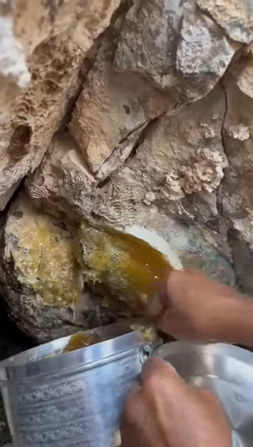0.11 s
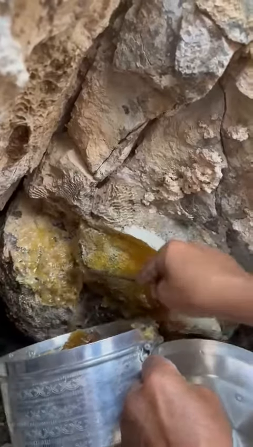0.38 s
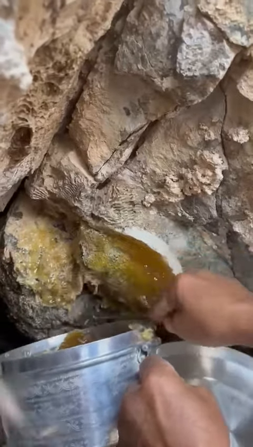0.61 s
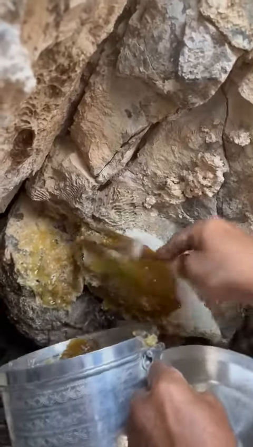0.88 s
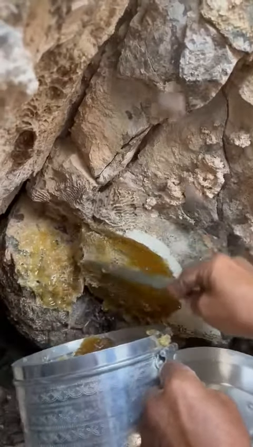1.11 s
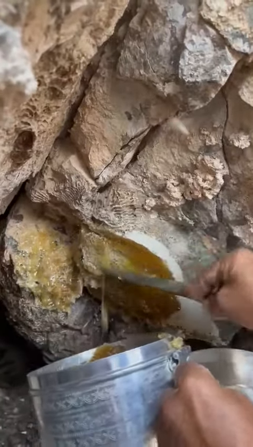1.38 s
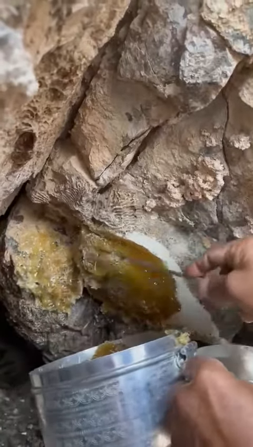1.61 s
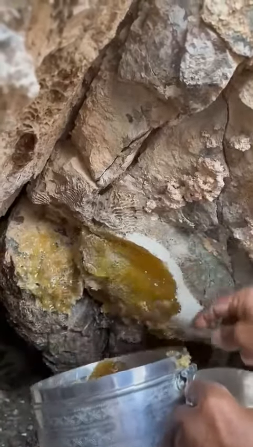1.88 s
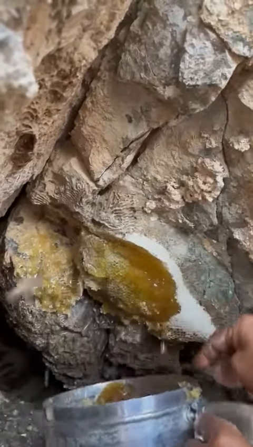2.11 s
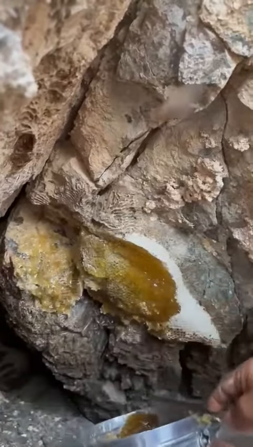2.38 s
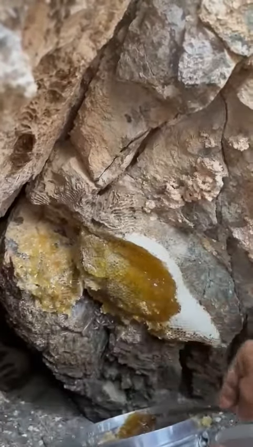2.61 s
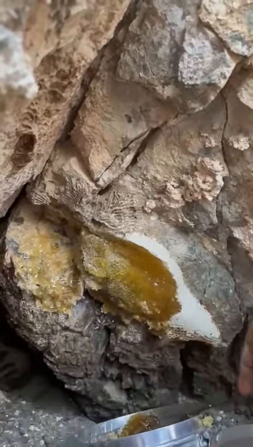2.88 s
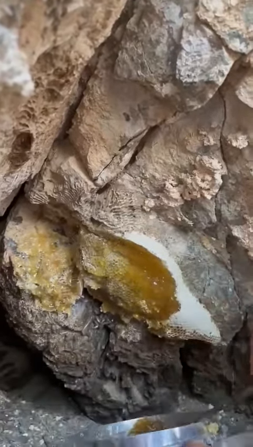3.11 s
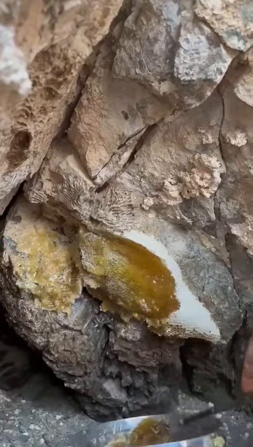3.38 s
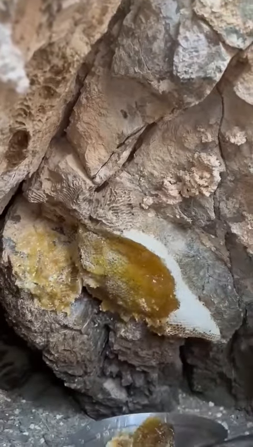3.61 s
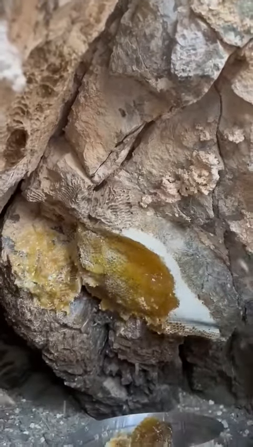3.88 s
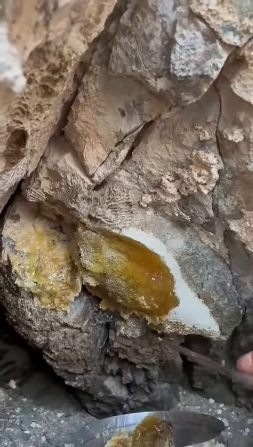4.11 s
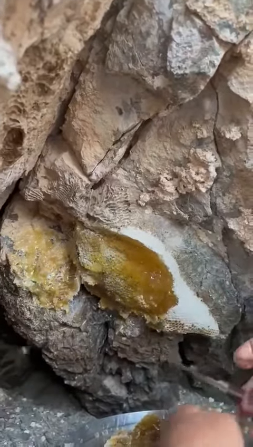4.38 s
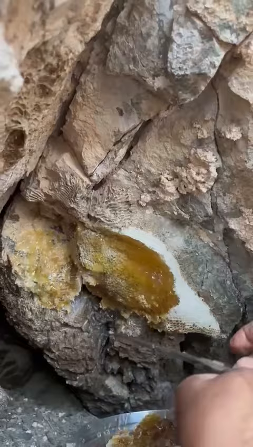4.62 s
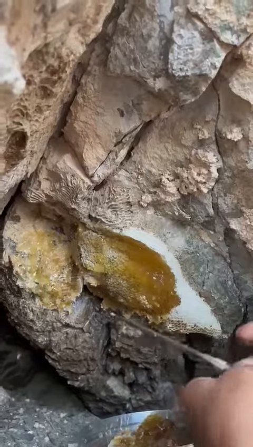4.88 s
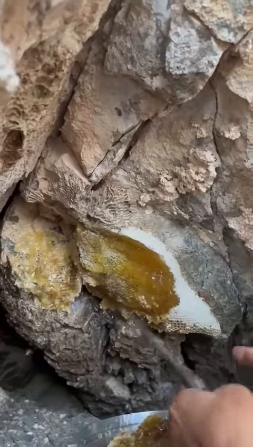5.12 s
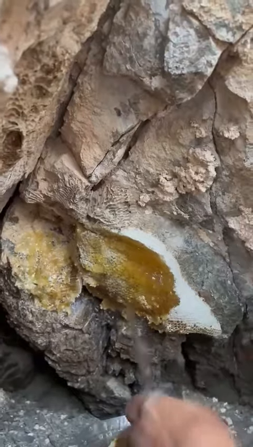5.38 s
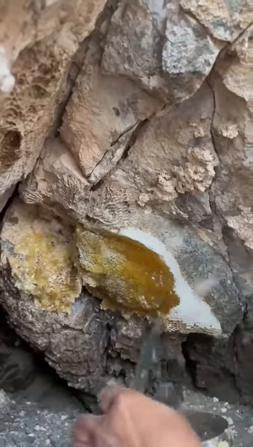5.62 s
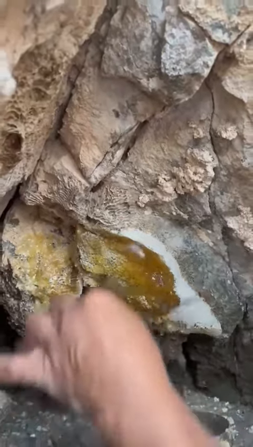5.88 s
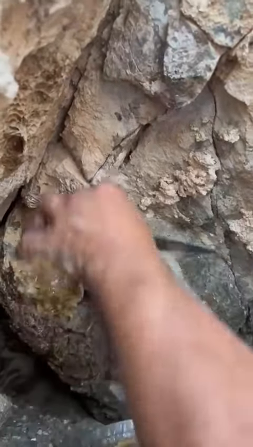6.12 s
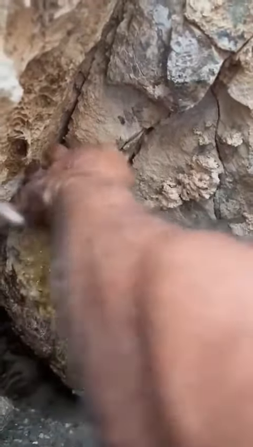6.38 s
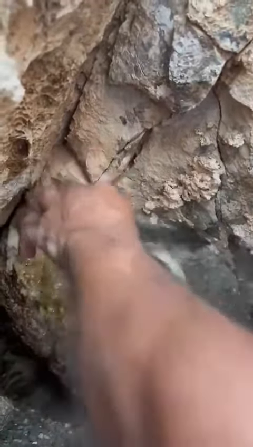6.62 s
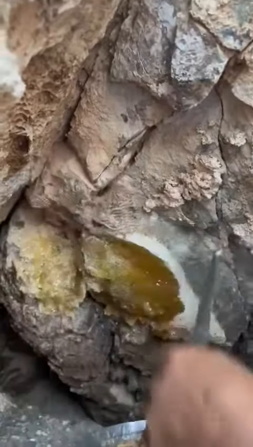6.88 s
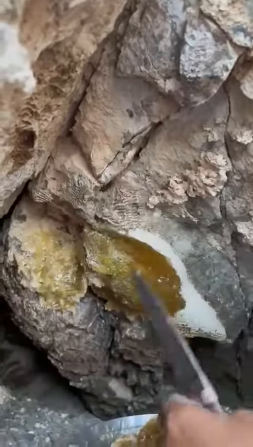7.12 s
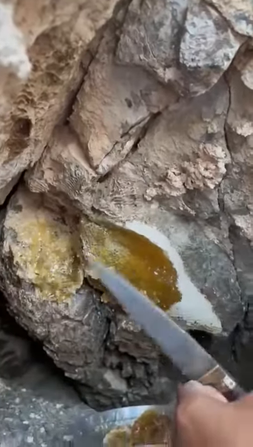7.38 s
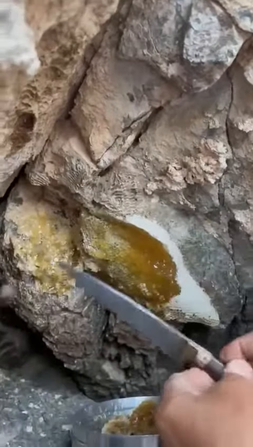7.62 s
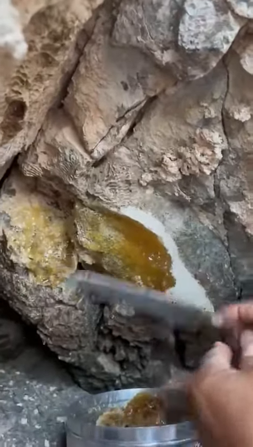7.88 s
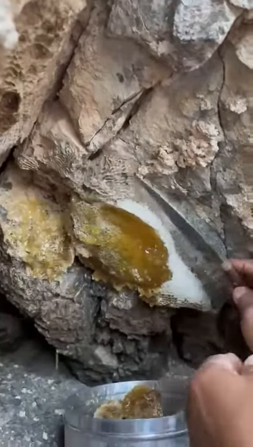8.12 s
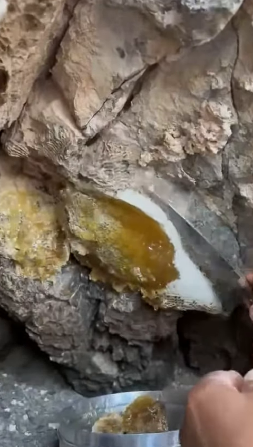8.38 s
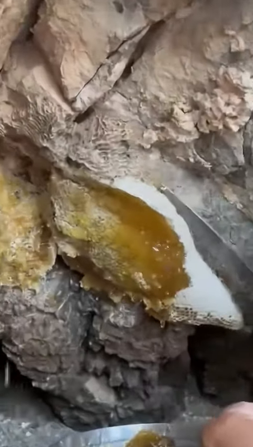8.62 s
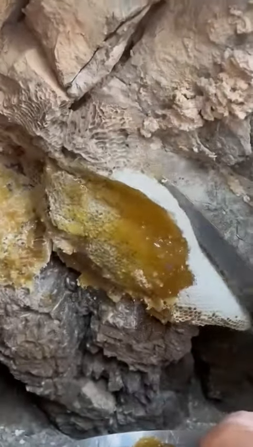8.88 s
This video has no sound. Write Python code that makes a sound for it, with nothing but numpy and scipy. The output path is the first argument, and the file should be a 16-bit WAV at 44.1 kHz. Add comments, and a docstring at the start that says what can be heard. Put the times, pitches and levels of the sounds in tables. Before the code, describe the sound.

Quiet low wind runs throughout, outdoors by a rock face, picked up close in stereo. Almost at once, at 0.06 s, a knife knocks hard, and again at 0.5 s, with gritty crunch and a short hollow metal clank. Faint ticks and touches follow around 1 to 2 s. At 2.25 s a firm knock and scrape lands, then a thin pot drags over grit in two short humming pushes between 2.55 and 3 s. From 3.0 to 4.4 s comes the densest run: bright clicks, scrapes and rubbing, with brief metallic ringing, clearest near 3.6 and 3.9 s. A near-still gap lasts until 5.35 s, when softer scratches come, then light scattered touches to 6.7 s. Scrapes return at 7.2 s, a thin high hiss swells faintly near 8 s, and a sharp ringing tap at 8.4 s closes, leaving wind. Tight rock echoes surround the metal.

```python
"""Low wind and faint rubbing come first; at once a knife knocks, then cuts and scrapes in a hollow of a rock face.
A thin metal pot is held close by. Each contact is a short grind of grit that drives damped modes of blade and pot;
blows add single notes, and some contacts leave the metal singing. Later the pot drags over grit in two pushes,
and a thin high hiss swells and fades. Rock echoes surround the metal; two microphone ports hear it all.
"""
import sys
import numpy as np
from scipy import signal
from scipy.fft import rfft, irfft, next_fast_len
from scipy.io import wavfile

SR = 44100
rng = np.random.default_rng(int(sys.argv[2]) if len(sys.argv) > 2 else 0)


def field_ratio(decibels):
    """Amplitude ratio for a level in dB (20 dB per decade); scalars and array-likes work."""
    return 10 ** (np.asarray(decibels, dtype=float) / 20)


def log_audio(samples):
    """Write samples as a 16-bit WAV file to the path given in sys.argv[1]."""
    # one column per channel
    frames = np.atleast_2d(samples).T
    # limit to full scale, then quantise
    limited = np.clip(frames, -1, 1)
    pcm = np.round(limited * 32767).astype(np.int16)
    wavfile.write(sys.argv[1], SR, pcm)


N = 396889

# wind level over time: start_s, level_db
WIND_LEVEL = [(0.0, -40.5), (1.8, -43.5), (2.33, -40), (2.7, -40.5), (3.53, -40.5), (4.9, -42), (5.81, -39),
              (6.36, -38.5), (6.72, -43), (8.32, -42), (8.7, -45.5), (9.0, -43.5)]
# relative wind spectrum: pitch_hz, level_db (per Hz)
WIND_SPECTRUM = [(25, -23.5), (45, -4), (80, 2.5), (163, -8.5), (268, -4.5), (450, -15), (741, -21),
                 (1400, -31.5), (2730, -42.5), (5500, -51), (8000, -46), (11500, -63.5), (12800, -60)]
# left-right likeness of the wind: pitch_hz, correlation (1 = the same on both sides)
WIND_LIKENESS = [(60, .998), (200, .998), (500, 0.66), (1200, 0.46), (2600, 0.67), (5000, 1), (7000, 1)]
# slow rubbing of blade and hands: start_s, drive_db
RUBBING_LEVEL = [(0.0, -62), (0.87, -74), (2.18, -66.5), (2.68, -52.5), (2.82, -56.5), (3.11, -45.5),
                 (3.4, -62.5), (3.61, -47.5), (3.75, -70.5), (4.05, -53.5), (4.41, -65.5), (4.54, -81.5),
                 (5.45, -64.5), (6.44, -72), (7.14, -62.5), (7.49, -69.5), (8.32, -64), (8.62, -73.5),
                 (9.0, -61)]
# contacts of the edge: start_s, low_mode_drive_db, high_mode_drive_db, grind_s
EDGE_CONTACTS = [(0.059, -20, -23.5, 0.008), (0.07, -42, -30.5, 0.0094), (0.091, -39.5, -27, .0068),
                 (0.479, -17, -19.5, 0.0077), (0.493, -22, -28.5, 0.019), (0.512, -23, -27.5, 0.013),
                 (0.584, -60, -52, .0042), (0.714, -60, -53, 0.0036), (0.831, -47, -52, .0089),
                 (1.043, -42, -32.5, 0.018), (1.067, -46, -31.5, 0.0073), (1.108, -61, -56, 0.0039),
                 (1.314, -62, -61, 0.024), (1.35, -40.5, -61, 0.0079), (1.794, -57, -55.5, 0.0064),
                 (1.837, -51.5, -48.5, 0.0048), (1.865, -66, -56, 0.0047), (1.899, -66, -65, 0.0079),
                 (1.99, -56, -65, 0.004), (2.108, -50, -60, 0.013), (2.182, -55, -37.5, 0.01),
                 (2.222, -51, -41.5, .0075), (2.239, -33, -39.5, 0.028), (2.262, -20.5, -22.5, 0.015),
                 (2.292, -24.5, -31, 0.01), (2.311, -34, -25.5, 0.011), (2.337, -34.5, -54, .011),
                 (2.37, -42, -51, 0.11), (2.401, -38.5, -50, .0062), (2.772, -58, -52, 0.0042),
                 (3.015, -19, -18, 0.014), (3.033, -27, -12, 0.01), (3.045, -22.5, -17.5, 0.0051),
                 (3.08, -28.5, -27, 0.0065), (3.104, -32, -32, 0.032), (3.136, -25, -21.5, .011),
                 (3.19, -32, -26, .0065), (3.201, -23.5, -37, 0.012), (3.214, -31.5, -32.5, 0.027),
                 (3.242, -30.5, -33.5, 0.0096), (3.432, -21, -30, 0.0062), (3.442, -29.5, -40.5, 0.01),
                 (3.488, -34.5, -51, 0.004), (3.515, -58, -51, 0.0027), (3.592, -25, -35, 0.016),
                 (3.611, -25, -31, .0078), (3.625, -16.5, -14.5, 0.0053), (3.683, -45, -60.5, 0.025),
                 (3.72, -39, -58, 0.034), (3.901, -40, -33.5, 0.0057), (3.911, -17, -13, 0.009),
                 (3.968, -22.5, -27, .0089), (3.975, -23, -21.5, 0.011), (4.116, -48.5, -45.5, 0.022),
                 (4.133, -48, -31.5, .015), (4.15, -47.5, -18, 0.01), (4.173, -33.5, -35, 0.014),
                 (4.235, -37.5, -24, 0.012), (4.257, -42, -33, 0.0044), (4.35, -30.5, -34.5, 0.017),
                 (4.385, -21.5, -31.5, 0.0098), (4.396, -22, -25.5, 0.0095), (4.418, -37, -33.5, 0.0046),
                 (5.343, -38, -32, 0.038), (5.37, -30, -28.5, 0.019), (5.397, -40.5, -30.5, 0.018),
                 (5.491, -48, -55, 0.0053), (5.526, -33, -24.5, 0.018), (5.55, -45, -28, 0.014),
                 (5.853, -44, -70.5, .0044), (5.93, -63, -66, 0.069), (6.002, -37.5, -31.5, 0.0027),
                 (6.131, -42, -30.5, 0.0035), (6.166, -38.5, -31.5, 0.023), (6.223, -37.5, -45, 0.0067),
                 (6.36, -58, -59.5, 0.053), (6.42, -51, -68.5, 0.031), (6.637, -51.5, -46.5, 0.018),
                 (6.662, -38.5, -36, 0.0031), (6.698, -51, -34, 0.0036), (6.709, -45.5, -42, 0.0057),
                 (7.162, -25.5, -24.5, 0.02), (7.19, -29.5, -26.5, 0.019), (7.217, -28, -32, 0.011),
                 (7.522, -41, -51.5, .0018), (8.106, -59, -42, 0.0024), (8.14, -57, -44.5, 0.015),
                 (8.252, -62, -45.5, .0042), (8.351, -37.5, -46, 0.023), (8.408, -19, -22, 0.0039),
                 (8.417, -24, -22.5, 0.013), (8.449, -45, -54, .0095)]
# thud against the low modes, heavy while cutting, light while tapping the rim: start_s, level_db
THUD_WEIGHT = [(0.0, -3.5), (0.5, -8), (1.4, 1), (2.3, 1), (3.0, -5), (3.45, -6), (3.6, -10), (4.4, -9.5),
               (5.4, -1.5), (6.0, -0.5), (7.2, -8), (8.4, -7.5)]
# centres of thud, knock, rasp and grit: pitch_hz
BAND_CENTRES = [350, 1000, 2500, 7000]
# damped modes of blade and pot: pitch_hz, width_hz (before the thin steel narrows it), relative level_db
DAMPED_MODES = [(244, 63, -3), (403, 34, -1), (584.5, 52, -3), (661, 72, -1.5), (892, 110, -0.5),
                (1067, 77, -1.5), (1244, 160, -12), (1483, 150, -7.5), (1640, 120, 0.5), (1946, 280, -3),
                (2470, 440, -1.5), (2860, 320, -3), (3244, 190, -0.5), (3696, 400, -5.5), (4182, 250, -2),
                (4940, 810, -2), (5654, 690, 1), (6440, 650, -0.5), (7010, 1100, -3), (7770, 260, -2),
                (8640, 1200, 0.5), (9400, 400, -5), (10265, 280, -3), (10900, 1400, -6.5),
                (11425, 690, -11.5)]
# blows, with the weight of the hand low, the pot wall near 1 kHz, the blade tip high:
# start_s, relative level_db, pitch_hz
BLOW_NOTES = [(0.06, -12, 347), (0.061, -12.5, 1082), (0.479, -7.5, 367), (0.481, -4.5, 1047),
              (0.494, -9, 1033), (1.045, -32, 2320), (1.068, -23, 2370), (1.072, -32, 5300),
              (1.078, -28, 2680), (1.352, -25, 390), (2.267, -8, 420), (2.266, -7.5, 1043),
              (2.297, -15.5, 300), (2.339, -20, 121), (2.451, -21.5, 384), (3.018, -12.5, 1150),
              (3.04, -22, 412), (3.081, -24.5, 904), (3.434, -15.5, 951), (3.595, -6.5, 910),
              (3.624, -12, 870), (3.6258, -7, 5370), (3.686, -35, 2400), (3.7204, -34, 2400),
              (3.913, -14.5, 1030), (3.978, -13, 918), (4.353, -14.5, 924), (4.389, -17.5, 609),
              (5.37, -29, 330), (5.855, -30, 500), (5.971, -25.5, 266), (6.2235, -29, 2248),
              (7.17, -22, 300), (8.354, -26.5, 990), (8.411, -13, 1122), (8.414, -15, 373)]
# ringing time of a blow: pitch_hz, t60_s
BLOW_DECAY = [(120, .045), (400, .04), (950, 0.068), (2300, .03), (5400, 0.031)]
# echoes off the rock faces: delay_s (left side), left_db, right_db
ROCK_ECHOES = [(.004, -18, -21), (.007, -15, -14), (.012, -17, -17), (.019, -20.5, -20)]
# moments when the metal is left free and sings: start_s, relative low_mode_db, relative high_mode_db
FREE_TAPS = [(0.095, -36, -28.5), (0.5151, -18.5, -31.5), (1.3504, -32, -51), (2.2932, -15, -15.5),
             (3.048, -21.5, -18.5), (3.6234, -21, -11), (3.914, -2, -4), (3.9775, -12.5, -13),
             (4.399, -24.5, -20), (4.4166, -33.5, -16.5), (5.5485, -23, -26), (7.221, -10, -21.5),
             (8.4188, -16.5, -8.5)]
# modes of the free metal: pitch_hz, relative level_db, t60_s
FREE_MODES = [(1065, -5, .18), (1136, -4, .2), (1690, -13, .18), (2425, -14, .12), (2580, -18, .2),
              (3210, 0, .15), (3500, -18, .18), (4130, -13, .13), (4463, -5, .11), (5093, -10, .09),
              (6180, -7, .065), (8800, -9, .06)]
# two pushes of the pot over grit: start_s, level_db
DRAG_LEVEL = [(2.47, -66), (2.53, -70), (2.565, -44.5), (2.79, -53.5), (2.874, -43.5), (3.0, -53.5)]
# modes of the pot resting on stone: pitch_hz, width_hz, relative level_db
DRAG_MODES = [(835, 32, -4), (1080, 30, -0.5), (1655, 30, -0.5), (2522, 46, -11), (3195, 140, -14.5),
              (3707, 79, -11.5), (4260, 120, -15), (4783, 140, -19.5), (5770, 350, -26)]
# thin high hiss: start_s, level_db
HISS_LEVEL = [(7.885, -90), (7.93, -65), (8.03, -53.5), (8.12, -78)]
# microphone ports: pitch_hz, lead of the right port (radians)
PORT_LEAD = [(150, 0), (400, .6), (750, 1.1), (1400, .1), (1950, 0), (2600, -1.3), (3300, -1.2),
             (3800, -.4), (4400, -1.8), (5100, 0), (6100, -1.5), (6850, -3.05), (8600, -3.2), (9200, -4.7),
             (10000, -6.2), (12500, -5.6)]


def rms_one(x):
    """Scales a signal to rms 1."""
    return x / np.sqrt(np.mean(x ** 2) + 1e-20)


def in_time(rows, outside=None):
    """Draws straight lines between the rows, one curve per column after the time."""
    s, *columns = np.transpose(rows)
    return [np.interp(np.arange(N) / SR, s, c, outside, outside) for c in columns]


def at_hz(points, hz):
    """Reads a two-column table at a pitch, along log frequency."""
    return np.interp(np.log(hz), np.log(np.array(points)[:, 0] + 1), np.array(points)[:, 1])


def drift(rate_hz):
    """Slow chance of rms 1: noise at every 20th sample through a double one-pole low-pass."""
    r = np.exp(-40 * np.pi * rate_hz / SR)
    noise = rng.standard_normal(N // 20 + 4002)
    slow = signal.lfilter([1], [1, -2 * r, r * r], noise)[4000:]   # past the settling of the filter
    return np.interp(np.arange(N) / 20, np.arange(len(slow)), rms_one(slow))


def resonance(x, hz, width_hz):
    """A damped mode: two poles, gain 1 on top."""
    r = np.exp(-np.pi * width_hz / SR)
    poles = [1, -2 * r * np.cos(2 * np.pi * hz / SR), r * r]
    return signal.lfilter([(1 - r * r) / 2, 0, (r * r - 1) / 2], poles, x)


def ring(taps, hz, t60_s):
    """A free mode: a unit tap sets a decaying sine of height 1 ringing."""
    r, w = field_ratio(-60 / (t60_s * SR)), 2 * np.pi * hz / SR
    return signal.lfilter([0, np.sin(w)], [1, -2 * r * np.cos(w), r * r], taps)


def grit(per_s, size_db):
    """Dense slips over grains, uneven in size and of either sign; rms 1."""
    sizes = field_ratio(size_db * np.minimum(rng.exponential(1, N), 4)) * rng.choice([-1, 1], N)
    return rms_one(sizes * (rng.random(N) < per_s / SR))


def wind(gust_db):
    """Third-octave noise bands; its slow rise and fall moves mainly the low ones, gusts stir each on its own."""
    edges = 25 * 2 ** np.arange(0, 9.1, 1 / 3)
    white = rng.standard_normal((2, 2, N))
    low_db, = in_time(WIND_LEVEL)
    out = 0
    for k, (low, high) in enumerate(zip(edges, edges[1:])):
        band = signal.butter(2, [low, high], "band", fs=SR, output="sos")
        mid, side = signal.sosfilt(band, white[k % 2])
        hz = np.sqrt(low * high)
        alike = np.clip(at_hz(WIND_LIKENESS, hz), -1, 1)
        swell_db = (low_db - low_db.mean()) / (1 + hz / 900) + gust_db * drift(2.1)
        stereo = np.sqrt(1 + alike) * mid + np.sqrt(1 - alike) * side * [[1], [-1]]
        out = out + field_ratio(at_hz(WIND_SPECTRUM, hz) + swell_db) * stereo
    return field_ratio(low_db.mean()) * rms_one(out)


def contacts():
    """Edge contacts and faint stray touches of crumbs and fingers, with the drive of thud, knock, rasp and grit."""
    stray_count, stray_db, spread_db, stray_grind_s = 14, -72, 5.5, 0.0041
    draw = rng.random((stray_count, 3))
    stray_start = draw[:, 0] * (N / SR - .2)
    stray_drive_db = stray_db + spread_db * 2 * (2 * draw[:, 1:] - 1)
    stray = np.c_[stray_start, stray_drive_db, np.full(stray_count, stray_grind_s)]
    s, low_db, high_db, grind_s = np.vstack([EDGE_CONTACTS, stray]).T
    weight_db = low_db + np.interp(s, *np.transpose(THUD_WEIGHT))
    thud_db = 10 * np.log10(field_ratio(2 * weight_db) + field_ratio(2 * -48))   # the hand always adds some weight
    rasp_db = low_db + 0.49 * (high_db - low_db) - 1   # the middle modes lie between low and high
    return s, grind_s, np.c_[thud_db, low_db, rasp_db, high_db]


def blade_on_rock(rise, sag_s, release_s, linger, spot_db):
    """Grit under contacts and slow rubbing drives damped modes; each spot struck favours others."""
    hz, width_hz, level_db = np.transpose(DAMPED_MODES)
    width_hz = width_hz / (1 + hz / 9000)   # thin steel keeps its high modes sharp
    band = np.searchsorted(np.sqrt(np.multiply(BAND_CENTRES[1:], BAND_CENTRES[:-1])), hz)
    share = field_ratio(level_db)
    band_power = np.bincount(band, share ** 2 * width_hz * np.pi / SR)
    share /= np.sqrt(band_power)[band]   # each band passes about rms 1
    rub_db, = in_time(RUBBING_LEVEL)
    # in the rubbing the knock stands out by 3.5 dB, the thud sinks by 2.5
    dull_db = np.outer(band < 2, 3.5) - np.outer(band == 0, 6.0)
    press = field_ratio(rub_db + 2.4 * drift(25) + dull_db)

    t = np.arange(round(.1 * SR)) / SR
    touches = contacts()
    spots = rng.normal(0, spot_db, (len(touches[0]), len(hz)))
    for s, grind_s, drive_db, spot in zip(*touches, spots):
        # long strokes set in and die away more gently than ticks
        onset = 1 - np.exp(-t / (rise * grind_s))
        release = np.maximum(t - grind_s, 0) / (release_s + linger * grind_s)
        shape = onset * np.exp(-t / sag_s - release)
        start = round(s * SR)
        press[:, start:start + len(t)] += np.outer(field_ratio(drive_db[band] + spot), shape)

    slips = [grit(per_s=5400, size_db=3.0), grit(per_s=5000, size_db=2.0)]
    out = np.zeros(N)
    for k in range(len(hz)):
        mode = resonance(slips[k % 2] * press[k], hz[k], width_hz[k])
        out += mode * share[k] * (-1) ** (k // 2)   # polarity flips every two modes
    return out


def blows(cycles, cycles_growth):
    """A soft push starts each single note; it lasts more cycles the higher the note, which shifts with the grip."""
    out = np.zeros(N)
    for s, level_db, hz in BLOW_NOTES:
        push = np.hanning(round(cycles * (hz / 1000) ** cycles_growth * SR / hz) + 2)
        push = push * np.cos(2 * np.pi * hz / SR * np.arange(len(push)))
        note = ring(np.eye(1, round(.25 * SR))[0], hz, at_hz(BLOW_DECAY, hz))
        swing = np.convolve(note, push)
        start = round(s * SR)
        out[start:start + len(swing)] += field_ratio(level_db) * swing / np.abs(swing).max()
    return out


def hollow(x):
    """Rock faces add a few echoes without bass, at other delays and levels per side."""
    thin = signal.sosfilt(signal.butter(1, [500, 6000], "band", fs=SR, output="sos"), x)
    out = np.array([x, x])
    for s, left_db, right_db in ROCK_ECHOES:
        lags = round(s * SR), round(1.13 * s * SR)   # the right side hears each echo later
        for side, (echo_db, lag) in enumerate(zip((left_db, right_db), lags)):
            out[side, lag:] += field_ratio(echo_db) * thin[:-lag]
    return out


def free_metal(spot_db, below_db):
    """One tap sets every free mode ringing with a strength of its own."""
    s, low_db, high_db = np.transpose(FREE_TAPS)
    out = np.zeros(N)
    spots = rng.normal(0, spot_db, (len(FREE_TAPS), len(FREE_MODES)))
    for k, (hz, level_db, t60_s) in enumerate(FREE_MODES):
        taps = np.full(N, 1e-18)
        tap_db = (low_db if hz < 1400 else high_db) + level_db + spots[:, k] - below_db
        taps[np.round(s * SR).astype(int)] = field_ratio(tap_db)
        out += ring(taps, hz, t60_s)
    return out


def dragged_pot(uneven_db, tilt_db):
    """Grains under the pot keep its narrow modes humming, each catching and letting go on its own."""
    grains = grit(per_s=700, size_db=4.5)
    hum = np.zeros(N)
    for hz, width_hz, level_db in DRAG_MODES:
        drive_db = level_db + tilt_db * np.log2(hz / 1000) + uneven_db * drift(20)
        hum += resonance(grains * field_ratio(drive_db), hz, width_hz)
    return field_ratio(in_time(DRAG_LEVEL, -120)[0]) * rms_one(hum)


def hiss():
    """Noise in a high band swells and fades."""
    band = signal.butter(2, [6800, 9900], "band", fs=SR, output="sos")
    return field_ratio(in_time(HISS_LEVEL, -120)[0]) * rms_one(signal.sosfilt(band, rng.standard_normal(N)))


def scene():
    """Knife, pot, metal and hiss sound inside the hollow; the wind lies beneath without echoes."""
    knife = blade_on_rock(rise=.15, sag_s=0.031, release_s=0.0017, linger=0.48, spot_db=4.5)
    pot = blows(cycles=1.6, cycles_growth=0.36)
    metal = free_metal(spot_db=1.8, below_db=12.0) + dragged_pot(uneven_db=1.5, tilt_db=-1.0)
    return hollow(knife + field_ratio(-2.5) * pot + metal + hiss()) + wind(gust_db=2.0)


def top_cut(x):
    """Nothing passes above the cut-off."""
    return signal.sosfilt(signal.butter(12, 12860, fs=SR, output="sos"), x)


def record(dry):
    """Two microphone ports hear out of step, opposed near 8 kHz; peaks round off and the top is cut."""
    size = next_fast_len(N + 4096)
    hz = np.arange(size // 2 + 1) * SR / size + 1
    tone_db = -1.3 * np.exp(-np.log2(hz / 350) ** 2)   # the left port is fuller in the low mids
    turn = np.exp(.5j * at_hz(PORT_LEAD, hz)) * field_ratio(tone_db)
    heard = irfft(rfft(dry, size) * np.array([1 / turn, turn]), size)[:, :N]
    rounded = 0.89 * np.tanh(heard / .95)
    top = signal.cheby2(12, 60, 13100, fs=SR, output="sos")
    return top_cut(signal.sosfilt(top, rounded))


dry = scene()
out = record(dry)
log_audio(out)
```